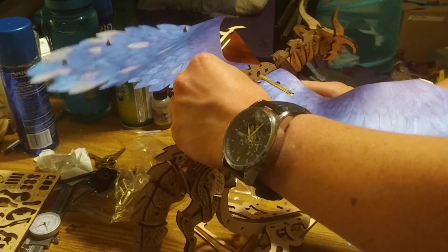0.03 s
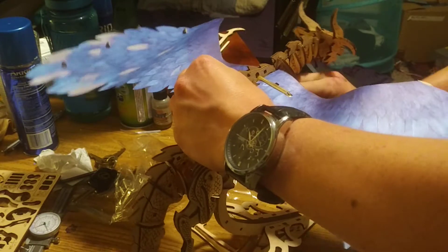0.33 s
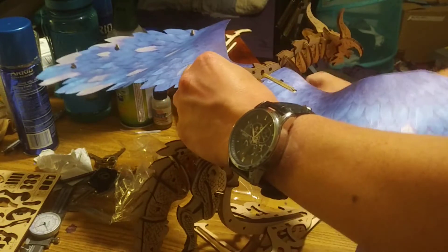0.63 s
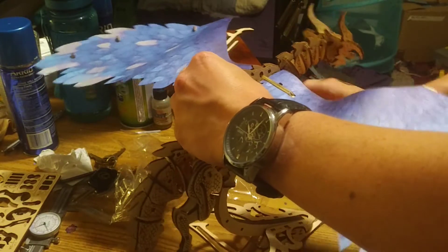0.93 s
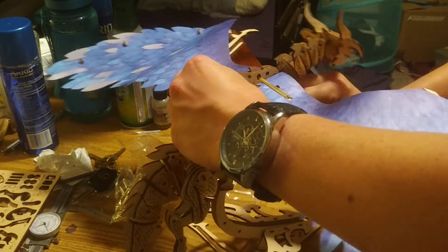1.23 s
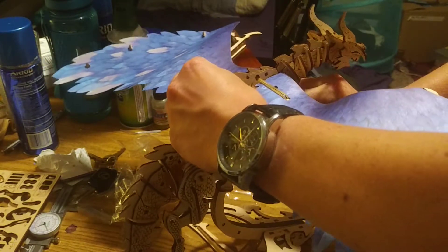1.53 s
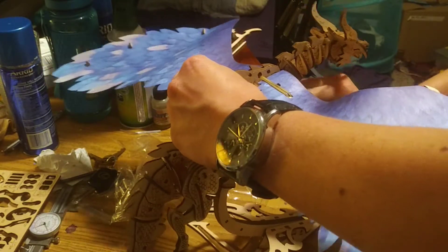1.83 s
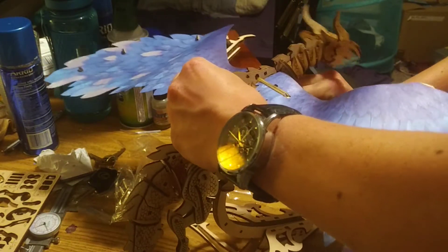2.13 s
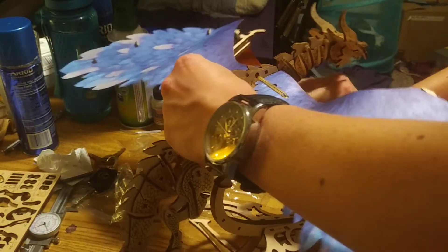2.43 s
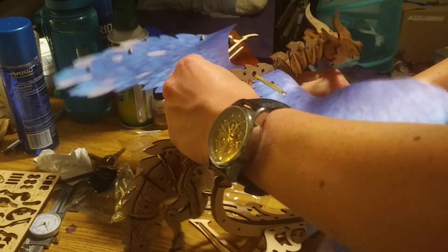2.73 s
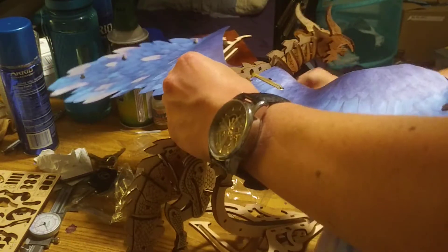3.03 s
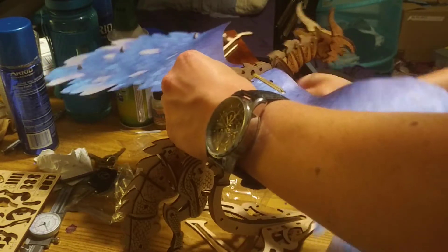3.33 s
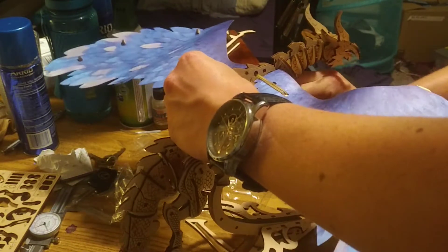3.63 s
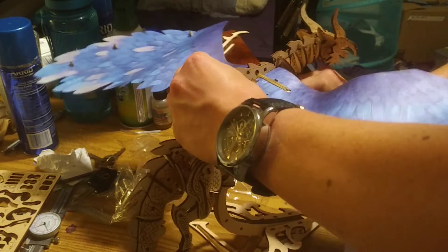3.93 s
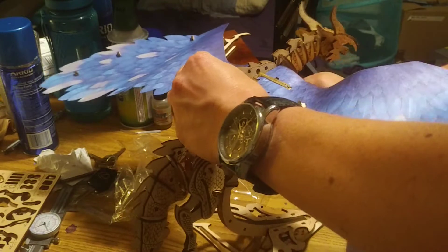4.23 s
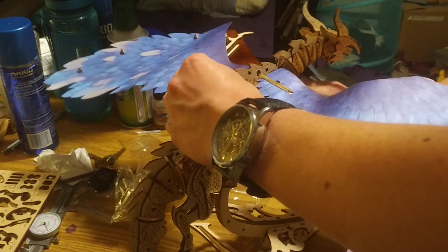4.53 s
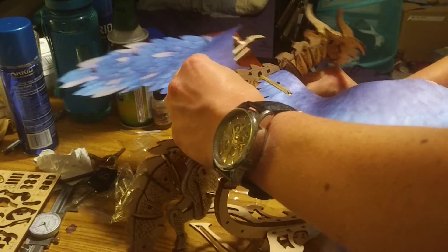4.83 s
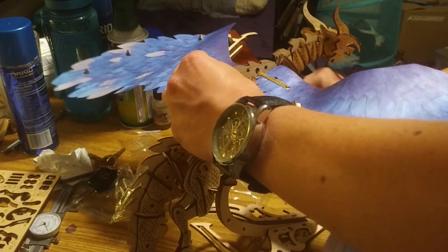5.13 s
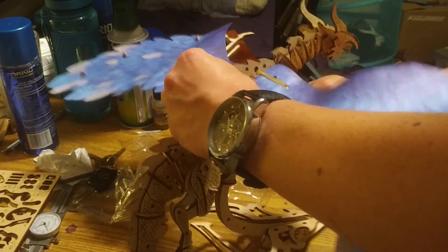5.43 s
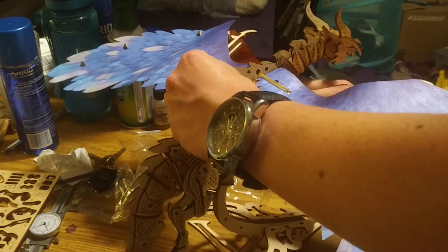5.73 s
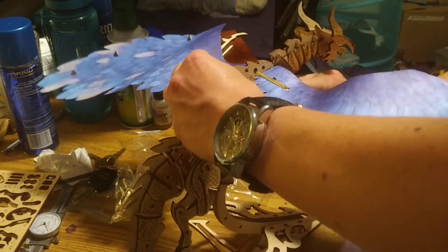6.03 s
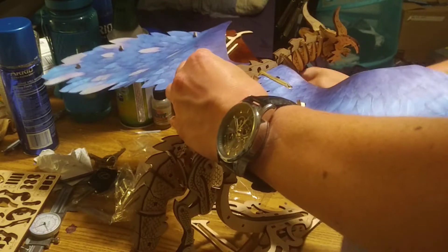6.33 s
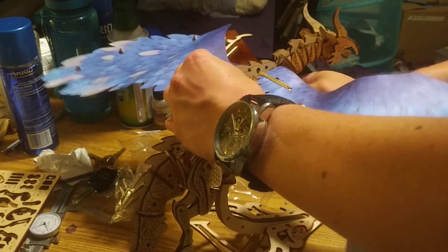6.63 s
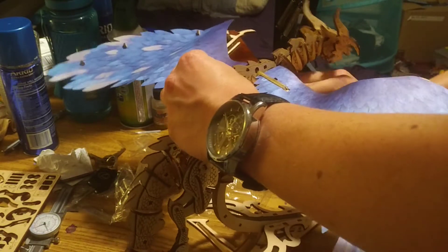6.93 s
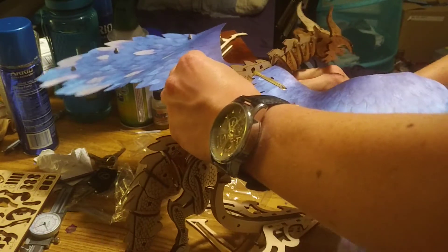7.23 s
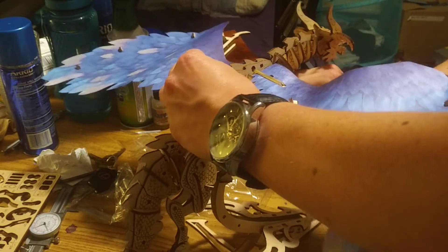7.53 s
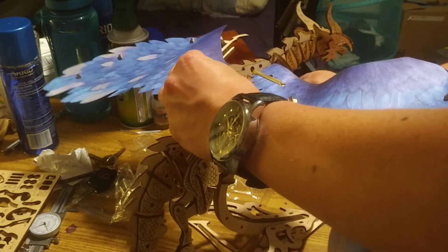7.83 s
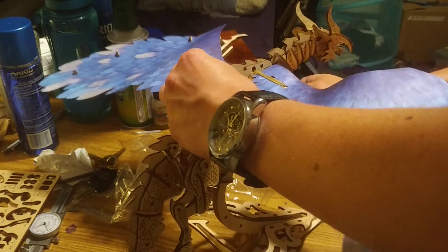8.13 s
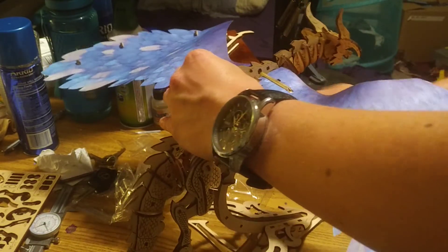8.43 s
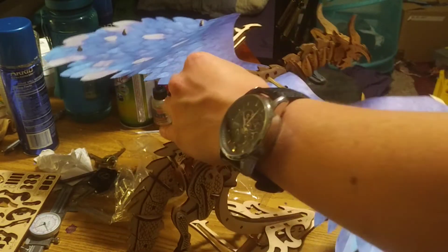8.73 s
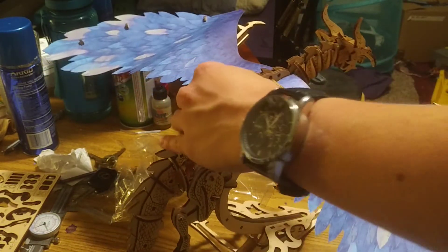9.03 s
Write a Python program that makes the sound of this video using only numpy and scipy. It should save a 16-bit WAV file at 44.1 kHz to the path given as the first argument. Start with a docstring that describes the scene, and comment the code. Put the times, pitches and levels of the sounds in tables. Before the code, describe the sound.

A plywood model dragon is worked by hand, its wooden ratchet giving six short bursts of about a dozen crisp, rapid clicks each. Dry wood rubs faintly with every stroke, and loose links clack lightly as the wings sink in between. Near the end something slides softly and bumps the desk. The sound is close, in a small, quiet room with a faint hum.

```python
"""A wooden pawl ratchets over about twelve teeth per stroke as a plywood model dragon is worked by hand.
Six strokes; each tooth snaps and rings the frame, and dry wood rubs before, during and after a stroke.
Between strokes the wings sink and the slack linkage clacks. Something slides softly on the desk
now and then and bumps it at the end. The small, quiet room has a faint hum and a dull drone."""
import sys
import numpy as np
from scipy import signal
from scipy.fft import rfft, irfft
from scipy.io import wavfile

SR = 44100
rng = np.random.default_rng(int(sys.argv[2]) if len(sys.argv) > 2 else 0)


def digitize_waveform(pressure):
    """Quantize a signal to 16-bit integers and store it at the path in sys.argv[1].

    Rows of a 2-D input are taken as channels; values are limited to [-1, 1].
    """
    field = np.atleast_2d(pressure).T
    bounded = np.clip(field, -1, 1)
    quanta = np.round(bounded * 32767).astype(np.int16)
    wavfile.write(sys.argv[1], SR, quanta)


N = 410130

# Hand strokes: first_tooth_s, last_tooth_s, tooth_count, speedup_log_ratio, braking_log_ratio,
# level_db, knock_offset_db, knock_swell_db, slide_back_delay_s
STROKES = [(0.4613, 0.7093, 11, 0.65, 0.69, -31.5, -17.5, -1.5, 0.16),
           (2.8012, 3.1977, 13, 0.43, 0.48, -32.5, -12.5, 3.5, 0.13),
           (3.9002, 4.2174, 12, 0.82, 1.35, -31.5, -18.5, -5.5, 0.11),
           (5.029, 5.3223, 12, 0.88, 0.8, -32, -14, 6, 0.14),
           (6.0924, 6.4464, 11, -.3, 0.77, -31, -17.5, -1.5, 0.208),
           (7.463, 7.89, 13, 0.33, 1.21, -32.5, -13.5, 1.5, 0.16)]


def pawl_hits(swell_db=1.5, stop_db=1.5):
    """The pawl drops off tooth after tooth; the wheel brakes late in the stroke."""
    hits = []
    for first_s, last_s, count, speedup, braking, stroke_db, knock_db, knock_swell_db, _ in STROKES:
        travel = np.linspace(0, 1, round(count) - 1)
        gaps = np.exp(braking * travel ** 7 - speedup * travel)
        elapsed = np.append(0, np.cumsum(gaps)) / gaps.sum()
        load = np.sin(np.pi * elapsed ** 1.9)  # peaks after mid-stroke
        load -= load.mean()
        level_db = stroke_db + swell_db * load
        level_db[-1] += stop_db
        start_s = first_s + (last_s - first_s) * elapsed
        even = np.transpose([start_s, level_db, knock_db + knock_swell_db * load])
        hits.extend(even + rng.standard_normal(even.shape) * [0.0003, 0.3, 2.5])  # jitter: s, dB, dB
    return hits


# Plywood frame modes: pitch_hz, level_db, t60_s
FRAME_MODES = [(478, -18.5, 0.013), (888, -13, 0.033), (1144, -9, 0.017), (1630, -4, 0.018),
               (1848, -2, 0.022), (2204, -1.5, 0.014), (2574, 2, 0.027), (3153, -3, 0.026)]


def ratchet():
    """Each drop of the pawl snaps and rings the plywood frame."""
    return clicks(pawl_hits(), FRAME_MODES, snap_gain_db=27, knock_gain_db=24,
                  rise_s=0.000842, fall_s=0.0017, detune=0.08, knock_left_db=-3.5)


# Snap spectrum: freq_hz, left_db, right_db
SNAP_SPECTRUM = [(160, -28.5, -33.5), (890, -18.5, -12.5), (1900, -12, -14.5), (3370, -19, -5),
                 (4400, -2, 3.5), (5500, -4, 5), (6860, 1.5, 3.5), (7900, -8.5, 2.5), (9150, -3.5, -6),
                 (12200, -4, -1.5), (14000, 6.5, -1), (16200, -3, -5)]


def clicks(hits, modes, snap_gain_db, knock_gain_db, rise_s, fall_s, detune, knock_left_db):
    """Wood slips off an edge and lands: a brief crackle and a hollow knock in the struck part."""
    snaps, knocks = np.zeros((2, 2, N))
    size, correlation = 400, 0.15
    t = (np.arange(size) - size // 4) / SR
    for start_s, level_db, knock_offset_db in hits:
        stretch = np.exp(0.44 * rng.standard_normal())  # no two edges are cut alike
        envelope = np.exp(-np.maximum(-t / rise_s, t / fall_s) / stretch)
        common = np.sqrt(correlation) * rng.standard_normal(size)
        crackle = common + np.sqrt(1 - correlation) * rng.standard_normal((2, size))
        add(snaps, start_s + t[0], gain(level_db + snap_gain_db) * unit_energy(envelope * crackle))
        knock = ring(modes, spread_db=5, detune=detune, size=3000)
        add(knocks, start_s - rise_s, gain(level_db + knock_offset_db + knock_gain_db) * knock)
    colour = np.array([minimum_phase(SNAP_SPECTRUM, column) for column in (1, 2)])
    return convolve(snaps, colour) + knocks * gain([[knock_left_db], [0]])


def ring(modes, spread_db, detune, size):
    """Decaying modes of a struck body; strike point and load shift their weight and pitch."""
    pitch_hz, level_db, t60_s = np.transpose(modes)[:, :, None]
    t = np.arange(size) / SR
    shape = pitch_hz.shape
    pitch_hz = pitch_hz * np.exp(detune * rng.standard_normal(shape))
    weight = gain(level_db + spread_db * rng.standard_normal(shape)) * rng.choice([-1, 1], shape)
    decay = np.exp(-np.log(1000) * t / t60_s)
    return unit_energy((weight * decay * np.sin(2 * np.pi * pitch_hz * t)).sum(0))


# Linkage clacks: start_s, level_db, knock_offset_db
LINKAGE_CLACKS = [(0.8593, -43.5, -17.5), (1.1507, -83, 14.5), (1.3211, -68.5, -0.5), (1.5039, -61, -3.5),
                  (1.7281, -68.5, -0.5), (2.3386, -66.5, 5), (2.6228, -83.5, 15), (3.3144, -43.5, -12),
                  (4.3258, -43, -15.5), (4.4113, -56.5, -1.5), (5.4368, -48.5, -10), (5.4627, -42, -10),
                  (5.515, -49.5, -7.5), (6.6152, -48.5, -7.5), (6.6574, -43.5, -17), (6.7782, -63, 4.5),
                  (8.0419, -51, -8.5), (8.1305, -53.5, -9), (8.216, -55, -1), (8.6253, -67, 2.5)]
# Link and pin modes: pitch_hz, level_db, t60_s
LINK_MODES = [(926, -16.5, 0.029), (1500, -8.5, 0.023), (1976, 4, 0.012), (2350, -8.5, 0.024),
              (3320, 1.5, 0.01)]


def linkage():
    """Slack closes as the wings sink; loose pins tick twice before each stroke."""
    pin_ticks = [(first_s - rng.uniform(0.012, 0.06), rng.normal(-62, 2), -5)
                 for first_s, *_ in STROKES for _ in range(2)]
    return clicks(LINKAGE_CLACKS + pin_ticks, LINK_MODES, snap_gain_db=26.5, knock_gain_db=28,
                  rise_s=0.00055, fall_s=0.0013, detune=0.06, knock_left_db=-8)


# Wood friction spectrum: freq_hz, density_db
RUB_SPECTRUM = [(250, -1), (800, 4.5), (1700, 7), (2500, 10), (3500, 7.5), (5500, 9), (9000, -23),
                (15000, -37)]


def rubbing(catches_per_s=900, left_db=-4, right_db=-2):
    """Dry wood catches in a dense patter as slack is taken up, gears scrape and links slide back."""
    pressure = np.zeros(N)
    for first_s, last_s, *_, slide_back_delay_s in STROKES:
        stroke_s = last_s - first_s
        take_up = (first_s - 0.045, 0.13, -68)
        scrape = (first_s + 0.54 * stroke_s, 0.72 * stroke_s, -54)
        slide_back = (last_s + slide_back_delay_s, 0.12, -60)
        pressure += arches([take_up, scrape, slide_back])
    catches = rng.standard_normal((2, N)) * (rng.random(N) < catches_per_s / SR)
    grain = unit_energy(convolve(catches, minimum_phase(RUB_SPECTRUM))) * np.sqrt(N)
    return grain * pressure * gain([[left_db], [right_db]])


# Bumps on the desk: start_s, level_db
DESK_BUMPS = [(8.754, -63), (8.774, -55), (9.191, -46)]
# Desk modes: pitch_hz, level_db, t60_s
DESK_MODES = [(129, -6.5, 0.24), (190, -0.5, 0.11), (254, -3.5, 0.058), (348, 4, 0.053), (455, 2.5, 0.041),
              (534, 4.5, 0.039), (667, 4, 0.038), (797, -1, 0.087), (970, -10, 0.024), (1270, -6, 0.024),
              (2100, 2, 0.0081)]


def desk_bumps(gain_db=25.5, cutoff_hz=1200):
    """Padded blows ring the desk top; the padding rounds off the attack."""
    thuds = np.zeros((2, N))
    for start_s, level_db in DESK_BUMPS:
        thud = ring(DESK_MODES, spread_db=2.4, detune=0.02, size=10000)
        add(thuds, start_s, gain(level_db + gain_db) * thud)
    return signal.lfilter(*signal.butter(2, cutoff_hz, fs=SR), thuds)


# Slides on the desk: centre_s, length_s, level_db
DESK_SLIDES = [(2.15, 0.27, -72), (4.56, 0.15, -68), (8.89, 0.27, -64), (9.21, 0.058, -56)]
# Sliding friction spectrum: freq_hz, density_db
SLIDE_SPECTRUM = [(80, -32), (280, -4.5), (480, -10), (800, -6.5), (1200, -14.5), (2000, -16.5),
                  (4000, -32), (10000, -42)]


def desk_slides():
    """Something slides on the desk: short swells of soft friction noise."""
    return noise(SLIDE_SPECTRUM) * arches(DESK_SLIDES)


# Echoes off nearby surfaces: delay_s, left_db, right_db
EARLY_ECHOES = [(.007, -11.5, -16), (.0095, -5, -75), (0.0206, -14, -39)]


def room(direct, wet_db=-1, sway_hz=1.3, tails=3):
    """Direct sound, early echoes and crossfading tails: the reverb shifts as the wings move."""
    mix = direct.copy()
    for delay_s, left_db, right_db in EARLY_ECHOES:
        add(mix, delay_s, direct * gain([[left_db], [right_db]]))
    t = np.arange(N) / SR
    for k in range(tails):
        crossfade = np.sqrt(2 / tails) * np.cos(np.pi * (sway_hz * t + k / tails))
        mix += gain(wet_db) * convolve(direct * crossfade, reverb_tail())
    return mix


# Room reverb: freq_hz, level_db, t60_s
REVERB_BANDS = [(210, 7.5, 0.12), (820, 2, 0.16), (1740, -4.5, 0.26), (3020, 0, 0.26), (4630, 2, 0.21),
                (7300, 1, 0.22), (10400, 1.5, 0.18), (14500, -3.5, 0.22)]


def reverb_tail(build_s=0.004, size=20000):
    """Diffuse reflections build up quickly, then each band decays at its own rate."""
    freq_hz, frame_s, bands = signal.stft(rng.standard_normal((2, size)), SR, nperseg=256)
    decay = np.exp(-np.log(1000) * frame_s / lookup(REVERB_BANDS, freq_hz, column=2)[:, None])
    tail = signal.istft(bands * decay, SR, nperseg=256)[1][:, :size]
    onset = 1 - np.exp(-(np.arange(size) / SR / build_s) ** 2)
    colour = gain(lookup(REVERB_BANDS, np.fft.rfftfreq(size, 1 / SR)))
    return irfft(rfft(unit_energy(tail * onset)) * colour, size)


# Drone spectrum: freq_hz, density_db
DRONE_SPECTRUM = [(62, -15), (122, -8), (160, -1.5), (205, -13.5), (300, -14), (440, -15.5), (520, -10.5),
                  (610, -17), (900, -24.5), (2000, -30), (6000, -45)]
# Drone envelope: time_s, level_db
DRONE_ENVELOPE = [(0.0, -80), (0.5, -69), (2.35, -67.5), (2.39, -76), (3.26, -63.5), (3.81, -76),
                  (4.76, -78), (4.79, -69), (6.85, -85.5), (7.64, -79), (8.6, -95)]


def drone(gain_db=2):
    """Dull noise that swells and fades."""
    level_db = np.interp(np.arange(N) / SR, *np.transpose(DRONE_ENVELOPE))
    return noise(DRONE_SPECTRUM) * gain(level_db + gain_db)


# Electric hum: pitch_hz, rms_db
HUM_TONES = [(120, -77)]
# Room noise spectrum: freq_hz, density_db
FLOOR_SPECTRUM = [(22, -23), (37, -19.5), (55, 2), (98, -5.5), (170, -7), (290, -12.5), (348, -0.5),
                  (405, -14), (800, -16), (1300, -22), (3000, -22), (7000, -22.5), (15400, -24)]


def room_tone(floor_rms_db=-66.5):
    """Faint electric hum over steady rumble and hiss."""
    t = np.arange(N) / SR
    hum = sum(np.sqrt(2) * gain(rms_db) * np.sin(2 * np.pi * (pitch_hz * t + rng.random()))
              for pitch_hz, rms_db in HUM_TONES)
    return hum + gain(floor_rms_db) * noise(FLOOR_SPECTRUM)


# Left-right likeness of the noise: freq_hz, correlation
STEREO_CORRELATION = [(50, 0.55), (150, 0.82), (400, 0.83), (1000, 0.091), (3000, 0.024), (15000, 0.012)]


def noise(spectrum):
    """Coloured stereo noise at unit rms, alike on both sides in the bass."""
    freq_hz = np.fft.rfftfreq(N, 1 / SR)
    left, independent = rfft(rng.standard_normal((2, N)))
    correlation = lookup(STEREO_CORRELATION, freq_hz)
    right = correlation * left + np.sqrt(1 - correlation ** 2) * independent
    coloured = np.array([left, right]) * gain(lookup(spectrum, freq_hz))
    return unit_energy(irfft(coloured, N)) * np.sqrt(N)


def arches(moves):
    """Half-sine pressure envelopes of short movements."""
    t = np.arange(N) / SR
    return sum(gain(level_db) * np.cos(np.pi * np.clip((t - centre_s) / length_s, -0.5, 0.5))
               for centre_s, length_s, level_db in moves)


def minimum_phase(spectrum, column=1, size=2048):
    """Impulse response with the given spectrum and no pre-ringing."""
    freq_hz = abs(np.fft.fftfreq(size, 1 / SR))
    log_gain = np.log(gain(lookup(spectrum, freq_hz, column)))
    return np.fft.ifft(np.exp(np.conj(signal.hilbert(log_gain)))).real[:size // 2]


def lookup(table, freq_hz, column=1):
    """One table column, interpolated over log frequency."""
    columns = np.transpose(table)
    return np.interp(np.log(freq_hz + 1), np.log(columns[0] + 1), columns[column])


def gain(db):
    """Decibels to amplitude."""
    return 10 ** (np.asarray(db) / 20)


def unit_energy(x):
    """Scales each channel to an energy of one."""
    return x / np.sqrt(np.sum(x ** 2, axis=-1, keepdims=True) + 1e-20)


def add(mix, start_s, sound):
    """Adds a sound to a stereo mix in place."""
    part = mix[:, max(round(start_s * SR), 0):][:, :sound.shape[-1]]
    part += sound[..., :part.shape[-1]]


def convolve(x, response):
    """Passes a stereo sound through an impulse response."""
    return signal.fftconvolve(x, np.atleast_2d(response), axes=1)[:, :N]


def scene():
    """The dragon and desk bumps in the room, over slides and background."""
    direct = ratchet() + linkage() + rubbing() + desk_bumps()
    return room(direct) + desk_slides() + room_tone() + drone()


def record(dry):
    """Low-pass at 15.9 kHz."""
    low_pass = signal.firwin(301, 15900, window=("kaiser", 8), fs=SR)
    return signal.oaconvolve(dry, low_pass[None], "same")


dry = scene()
out = record(dry)
digitize_waveform(out)
```